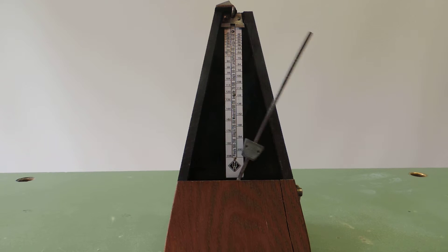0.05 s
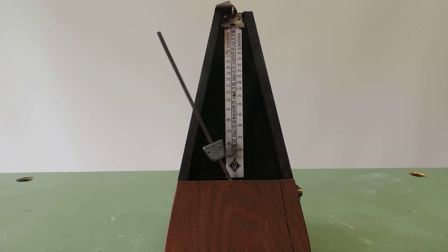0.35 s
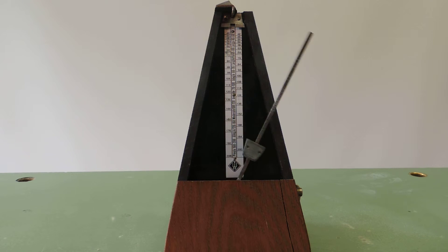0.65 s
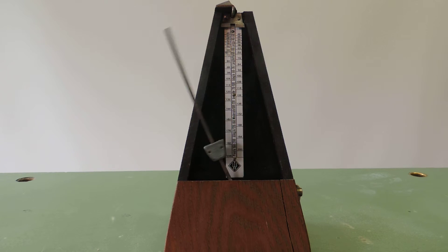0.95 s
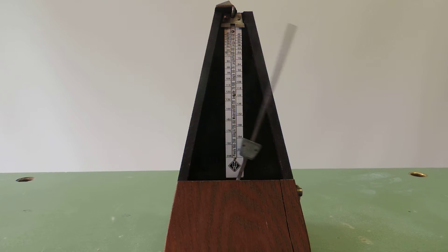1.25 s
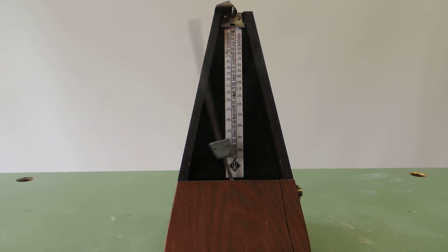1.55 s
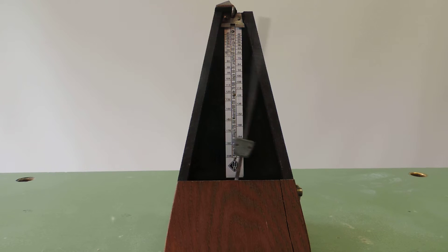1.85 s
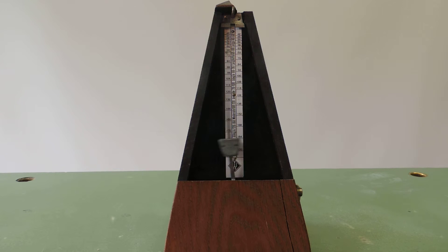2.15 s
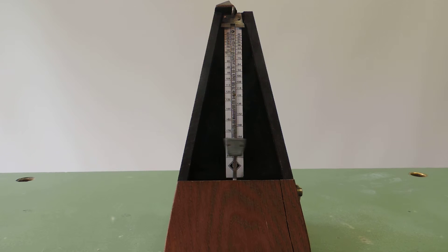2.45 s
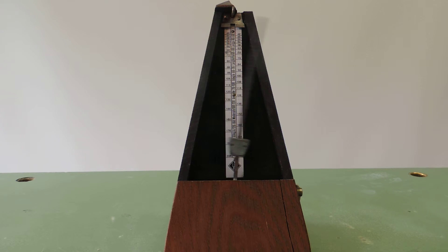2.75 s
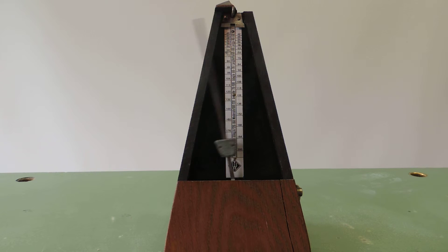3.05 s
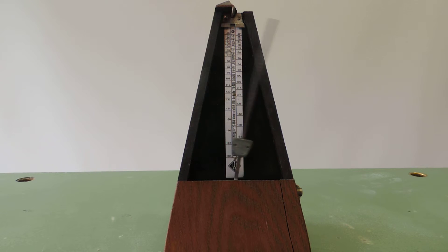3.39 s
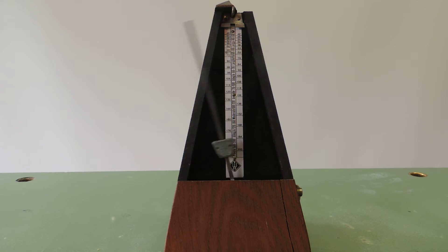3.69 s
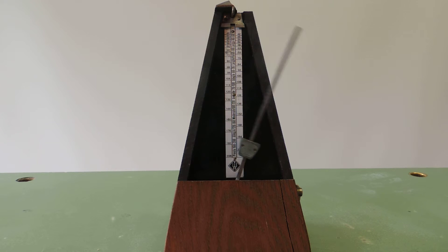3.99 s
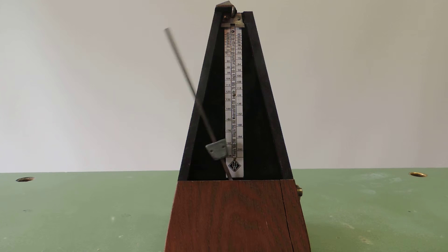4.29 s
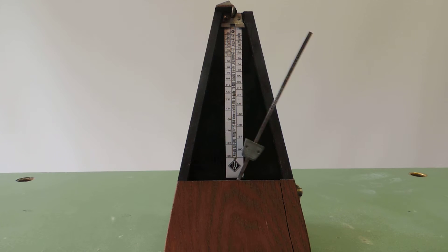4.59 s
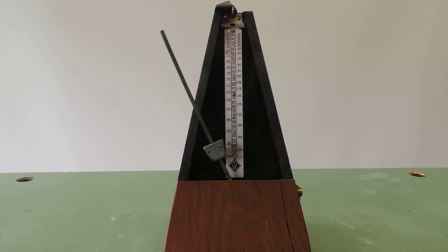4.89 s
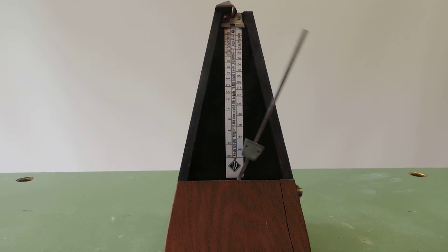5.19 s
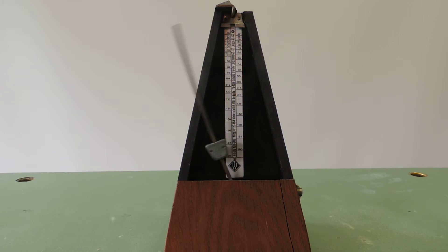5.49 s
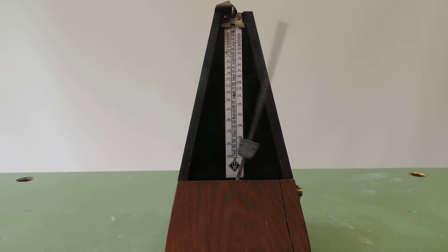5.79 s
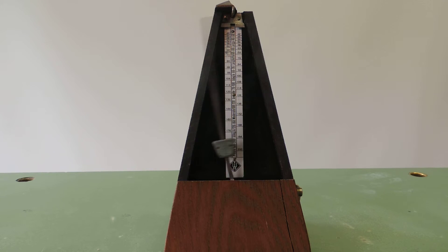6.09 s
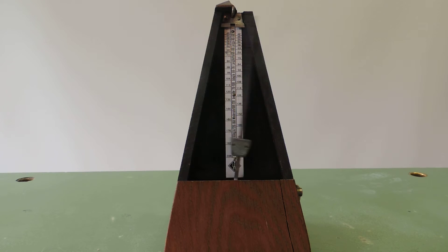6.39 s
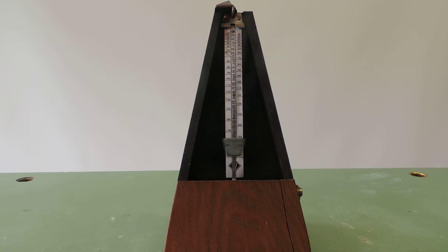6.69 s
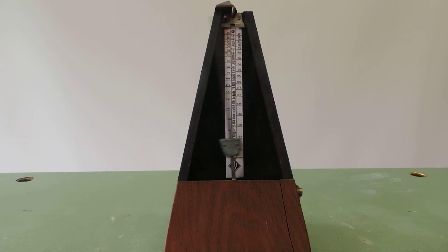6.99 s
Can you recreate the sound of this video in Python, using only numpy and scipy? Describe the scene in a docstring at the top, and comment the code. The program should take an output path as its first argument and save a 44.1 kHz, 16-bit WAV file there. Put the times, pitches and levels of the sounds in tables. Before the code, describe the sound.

A mechanical metronome ticks fast and steadily with sharp, wooden clicks, slightly off-beat, close up in a quiet room.

```python
"""Wooden, slightly off-beat ticking: a clockwork metronome on a table, close up, in stereo.
Two escapement pallets strike in turn; each cracks and rings the case and works in its own colour.
The spring's uneven push swells and brightens the ticks now and then; the works knock softly between.
A quiet, slightly live room answers each tick over faint rumble, hiss and two thin whistles."""
import sys
import numpy as np
from scipy import signal
from scipy.fft import rfft, irfft, next_fast_len
from scipy.io import wavfile

SR = 44100
rng = np.random.default_rng(int(sys.argv[2]) if len(sys.argv) > 2 else 0)


def wav_out(sig):
    """Save sig, one row per channel (or a flat mono array), as 16-bit PCM at SR to the path in sys.argv[1]."""
    wavfile.write(sys.argv[1], SR, np.round(np.clip(np.atleast_2d(sig).T, -1, 1) * 32767).astype(np.int16))


N = 319725
FIRST_S, SWING_S, OFFBEAT_S = 0.1152, 0.65128, 0.3062  # nominal: first blow, full swing, pallet 0 to 1
PALLET_BLOWS = [(-0.5, 1), (-0.88, -1.0)]  # per pallet: strength/dB, brightness/dB


def amp(db):
    """dB to gain."""
    return 10 ** (np.asarray(db) / 20)


def sides(pan_db):
    """Left and right gains for an L-R difference."""
    return amp(np.array([pan_db, -pan_db]) / 2)


def at(points, s):
    """Interpolate (t/s, value) points."""
    return np.interp(s, *np.transpose(points))


def along(points, hz):
    """Interpolate (f/Hz, value) points on a log axis."""
    point_hz, values = np.transpose(points)
    return np.interp(np.log(hz + 1), np.log(point_hz), values)


def bump(hz, centre_hz, width_hz):
    """Gaussian band of height 1."""
    return np.exp(-((hz - centre_hz) / width_hz) ** 2)


def filtered(x, gain):
    """Zero-phase filter by gain(hz)."""
    n = x.shape[-1]
    size = next_fast_len(n + 8192)
    return irfft(rfft(x, size) * gain(np.fft.rfftfreq(size, 1 / SR)), size)[..., :n]


def coloured(x, gain, size=4096):
    """Minimum-phase filter by gain(hz); attacks stay sharp."""
    cepstrum = irfft(np.log(gain(np.fft.rfftfreq(size, 1 / SR))))
    fold = np.r_[1, np.full(size // 2 - 1, 2), np.zeros(size // 2)]
    impulse = irfft(np.exp(rfft(cepstrum * fold)))
    return signal.fftconvolve(x, np.atleast_2d(impulse), axes=1)[:, :x.shape[1]]


def stereo_noise(n, correlation):
    """White noise with L-R correlation given as (f/Hz, correlation) points."""
    def mid_side_gains(hz):
        angle = np.arccos(np.clip(along(correlation, hz), -1, 1)) / 2
        return np.array([np.cos(angle), np.sin(angle)])
    mid, side = filtered(rng.standard_normal((2, n)), mid_side_gains)
    return np.array([mid + side, mid - side])


def varied(usual, fresh, share):
    """Renew a share of a recurring pattern's power."""
    return np.sqrt(1 - share) * usual + np.sqrt(share) * fresh


def add(track, s, sound):
    """Mix in at time s, which may be negative."""
    start = round(s * SR)
    part = sound[:, max(-start, 0):max(N - start, 0)]
    track[:, max(start, 0):max(start, 0) + part.shape[1]] += part


def still_room(rms_db=-57):
    """Building rumble under thin hiss."""
    spectrum = [(15, -8.5), (30, 4), (46, -7), (110, -8.5), (200, -14), (400, -15), (1000, -23),
                (3000, -22.5), (6000, -31.5), (13800, -31.5), (14500, -72)]  # f/Hz, relative density/dB
    correlation = [(30, 1), (130, 0.78), (600, 0.27), (2000, 0.35), (8000, .1)]  # f/Hz, L-R correlation
    air = filtered(stereo_noise(N, correlation), lambda hz: amp(along(spectrum, hz)))
    return amp(rms_db) * air / air.std()


def whistles():
    """Barely audible high tones swell, glide and fade."""
    glides = [(1.28, 0.16, 8680, 9020, -20.5, -70), (5.475, 0.1, 9800, 8300, 750, -65)]  # t/s, length/s, start/Hz, end/Hz, arch/Hz, level/dB
    out = np.zeros((2, N))
    for s, length_s, start_hz, end_hz, arch_hz, db in glides:
        progress = np.linspace(0, 1, round(length_s * SR))[None]
        arch = np.sin(np.pi * progress)
        hz = start_hz + (end_hz - start_hz) * progress + arch_hz * arch
        add(out, s, amp(db) * arch * np.sin(2 * np.pi * np.cumsum(hz) / SR))
    return out


def lingering(t, scatter_db=1.0, rise_s=0.0021):
    """Lightly damped resonances sing on, far below the blow."""
    tones = [(635, -45, 0.48), (963, -44, 0.29), (1135, -47.5, 0.48), (1545, -48.5, 0.45),
             (3114, -49.5, 0.76), (5540, -56, 0.6), (5460, -50, 0.49), (7550, -55, .5)]  # f/Hz, level/dB, t60/s
    hz, db, t60_s = np.transpose(tones)
    gains = amp(db + scatter_db * rng.standard_normal(len(hz)))
    modes = np.sin(2 * np.pi * hz[:, None] * t) * amp(-60 * t / t60_s[:, None])
    return gains @ modes * (1 - np.exp(-t / rise_s))


def room_answer(walls, build_s=0.0044, early_db=3.5, early_t60_s=0.12, top_hz=14300):
    """Near walls answer first, then a diffuse tail with lingering tones."""
    spectrum = [(150, -6), (420, 3.5), (630, 7.5), (830, -2), (1300, 0.5), (2200, 6), (3400, 7.5),
                (4600, 3.5), (6300, 1.5), (7800, 1), (9500, -6), (12300, -6.5), (14300, -21)]  # f/Hz, level/dB
    decay = [(200, 0.62), (700, 0.49), (3000, 0.67), (4600, 0.65), (5500, 0.76), (6400, 0.61), (8000, 0.62),
             (13000, 0.45)]  # f/Hz, t60/s
    pan = [(400, 0), (700, 3), (4400, -2), (8000, -2), (14000, 10.5)]  # f/Hz, L-R/dB
    shimmer = [(1528, 99, 7.5), (3010, 240, 4.5), (3700, 120, 4), (5540, 340, 9), (7450, 160, 2)]  # case and works resonances in the tail: f/Hz, width/Hz, boost/dB
    hz, frame_s, spectra = signal.stft(walls, SR, nperseg=512)
    t60_s = along(decay, hz)[:, None]
    fade = amp(-60 * frame_s / t60_s) * np.sqrt(2 * np.log(1000) / (t60_s * SR))  # unit energy
    shimmer_db = sum(db * bump(hz, centre_hz, width_hz) for centre_hz, width_hz, db in shimmer)
    colour = amp(along(spectrum, hz) + shimmer_db) * sides(along(pan, hz)) * (hz < top_hz)
    tail = signal.istft(spectra * fade * colour[:, :, None], SR, nperseg=512)[1]
    t = np.arange(tail.shape[1]) / SR
    onset = 1 - np.exp(-(t / build_s) ** 2)
    early_boost = 1 + amp(early_db - 60 * t / early_t60_s)
    return tail * onset * early_boost + lingering(t)


def escapement(blows=22, even_ms_per_db=0.34):
    """The pendulum frees one tooth each way. Rows: t/s, pallet, drive/dB."""
    spring_push = [(0.1, 0.5), (1.1, -1.5), (1.7, -1.24), (2.07, 2.2), (2.6, -1.0), (4.1, -1.5), (4.7, 3),
                   (5.0, 3.5), (5.95, -1.6), (6.95, -1.6)]  # uneven through the gears: t/s, drive/dB
    wander = [(0.1, 2), (1.6, 1.48), (2.7, -2.5), (5.2, 0.0), (6.3, -1.8), (6.62, 4.5)]  # t/s, lateness/ms
    swing, pallet = np.divmod(np.arange(blows), 2)
    s = FIRST_S + swing * SWING_S + pallet * OFFBEAT_S
    drive_db = at(spring_push, s)
    late_ms = at(wander, s) + even_ms_per_db * drive_db * (2 * pallet - 1)  # harder push, less limp
    return list(zip(s + late_ms / 1000, pallet, drive_db))


def soft_knocks(t60_s=0.055, rise_s=0.003, scatter_db=0.3):
    """The works shift dully between blows, louder under a harder push."""
    knocks = [(-.059, 740, 129, -59), (-.055, 337, 166, -58), (.186, 282, 160, -55.5)]  # each full swing: t/s from pallet 0, f/Hz, width/Hz, level/dB
    out, t = np.zeros((2, N)), np.arange(SR // 10) / SR
    envelope = amp(-60 * t / t60_s) * (1 - np.exp(-t / rise_s))
    envelope /= envelope.max()
    for s, _, drive_db in escapement()[::2]:
        for offset_s, centre_hz, width_hz, db in knocks:
            body = filtered(rng.standard_normal((1, len(t))), lambda hz: bump(hz, centre_hz, width_hz))
            gain = amp(db + drive_db + scatter_db * rng.standard_normal())
            add(out, s + offset_s, gain * envelope * body / body.std())
    return out


def case_ring(t, pallet, scatter_db=1.0, rise_s=0.00013):
    """Wooden case and works ring after a blow; neighbouring modes swing in opposite senses."""
    case_modes = [(422.6, 0.049, -24.5, -26, 1.5), (597.4, 0.027, -9.5, -8.5, 1.0),
                  (663.2, 0.034, -8.5, -9, 1.1), (977, 0.03, -28.5, -32.5, 2.5),
                  (1162, 0.065, -27, -29.5, 2.5), (1406, 0.032, -22.5, -22.5, 4),
                  (1566, 0.041, -18, -18.5, 3), (1933, 0.069, -26, -23.5, 2.5),
                  (2257, 0.0099, -10.5, -11.5, 1.5), (2405, 0.023, -20, -17.5, -3.5),
                  (2788, 0.011, -17, -11.5, -0.5), (3001, 0.025, -15.5, -11, -2.5),
                  (3119, 0.014, -6, -6, -2), (3528, 0.039, -14, -23, 1), (3517, 0.039, -14, -16, -1),
                  (3760, 0.018, -9, -7.5, -1.9), (3970, 0.03, -19, -17, -0.5),
                  (4190, 0.022, -23, -23.5, -11.5), (4435, 0.046, -26.5, -27, -6.5),
                  (5063, 0.013, -12, -17, -2), (5467, 0.022, -15.5, -13.5, -7), (5597, 0.034, -16, -19, 1),
                  (5945, 0.014, -21, -25, -5.5), (6370, 0.0092, -24, -39, 3), (7120, 0.019, -24, -22.5, -1),
                  (7330, 0.01, -22.5, -23, -14), (8140, 0.022, -28.5, -22.5, 4)]  # f/Hz, t60/s, pallet 0 level/dB, pallet 1 level/dB, L-R/dB
    hz, t60_s, first_db, second_db, pan_db = np.transpose(case_modes)
    gains = amp((first_db, second_db)[pallet] + scatter_db * rng.standard_normal(len(hz)))
    signs = (-1) ** np.arange(len(hz))
    modes = np.cos(2 * np.pi * hz[:, None] * t) * amp(-60 * t / t60_s[:, None])
    return (sides(pan_db) * gains * signs) @ modes * (1 - np.exp(-t / rise_s))


def crack(t, grain, rise_s=0.00067, t60_s=0.024):
    """Steel meets steel: dense, fast-dying modes as a noise burst."""
    spectrum = [(60, -18), (200, 0.5), (400, 2), (1000, -4), (2000, -17), (4000, 7.5), (6000, 7), (9500, 1),
                (13000, 0.5), (14200, -15), (15800, -28.5)]  # f/Hz, level/dB
    pan = [(500, -3), (4000, 4.5), (7500, -10), (9500, 2.5), (13000, 8.5)]  # f/Hz, L-R/dB
    envelope = (1 - np.exp(-t / rise_s)) * amp(-60 * t / t60_s)
    burst = grain * envelope / np.linalg.norm(envelope)
    return coloured(burst, lambda hz: amp(along(spectrum, hz)) * sides(along(pan, hz)))


def tooth_colour_db(hz, s, pallet, drive_db, bright_per_db=0.17, thud_per_db=-0.77):
    """Ping and thud shift as the wheel turns; a harder push adds treble and cuts the thud."""
    ping_band = (2760, 120)  # f/Hz, width/Hz
    thud_band = (423, 66)  # f/Hz, width/Hz
    first_ping = [(0.1, 4), (1.4, 12.5), (2.2, 2.5), (4.7, 3), (5.3, -6), (6.6, -4.5)]  # pallet 0: t/s, level/dB
    second_ping = [(1.1, 0), (2.4, -10.5), (3.0, -12.5), (3.7, 3.5), (5.0, 10), (6.9, 5.5)]  # pallet 1: t/s, level/dB
    thud_level = [(0.1, -0.5), (1.2, 1), (3.4, -3), (6.3, 3)]  # t/s, level/dB
    ping_db = at((first_ping, second_ping)[pallet], s)
    thud_db = at(thud_level, s) + thud_per_db * drive_db
    bright_db = PALLET_BLOWS[pallet][1] + bright_per_db * drive_db
    treble_weight = along([(2000, 0.016), (6000, 0.78)], hz)
    return ping_db * bump(hz, *ping_band) + thud_db * bump(hz, *thud_band) + bright_db * treble_weight


def metronome():
    """Each pallet repeats nearly the same tick, the room nearly the same answer."""
    wall_correlation = [(200, 1), (640, 0.83), (1400, .42), (3000, -0.22), (7000, 0.0083)]  # f/Hz, L-R correlation
    out, t = np.zeros((2, N)), np.arange(SR // 10) / SR
    new_grain = lambda: stereo_noise(len(t), [(500, 0.91), (4000, 0.64), (11000, 0.93)])
    new_walls = lambda: stereo_noise(SR // 2, wall_correlation)
    grains, walls = [new_grain(), new_grain()], new_walls()
    for s, pallet, drive_db in escapement():
        blow_db = drive_db + PALLET_BLOWS[pallet][0]
        tick = case_ring(t, pallet) + crack(t, varied(grains[pallet], new_grain(), share=0.34))
        add(out, s, coloured(tick, lambda hz: amp(blow_db + tooth_colour_db(hz, s, pallet, drive_db))))
        add(out, s, amp(blow_db) * room_answer(varied(walls, new_walls(), share=0.13)))
    add(out, FIRST_S + OFFBEAT_S - SWING_S, room_answer(walls))  # tail of the blow before t = 0
    return out


def scene():
    """The metronome in its room."""
    return metronome() + soft_knocks() + whistles() + still_room()


def record(dry):
    """Soft peak limit, then band limit."""
    top_hz = 16650
    rounded = dry / (1 + np.abs(dry) ** 6) ** (1 / 6)
    return filtered(rounded, lambda hz: hz < top_hz)


dry = scene()
out = record(dry)
wav_out(out)
```